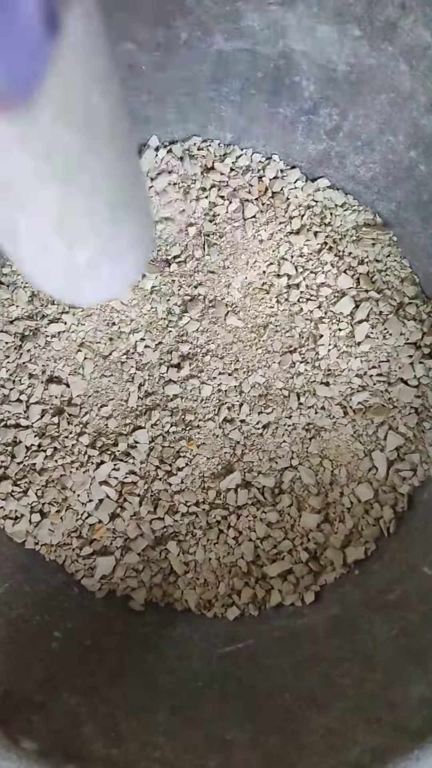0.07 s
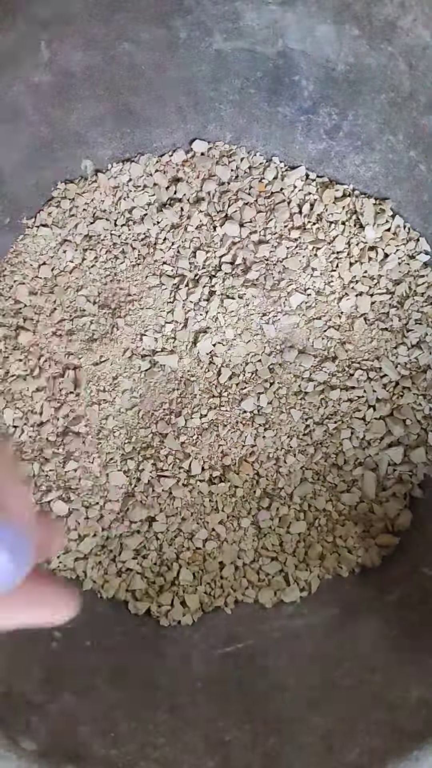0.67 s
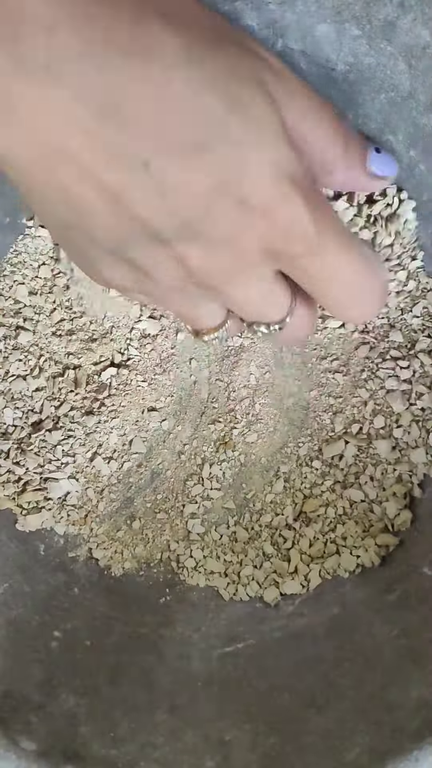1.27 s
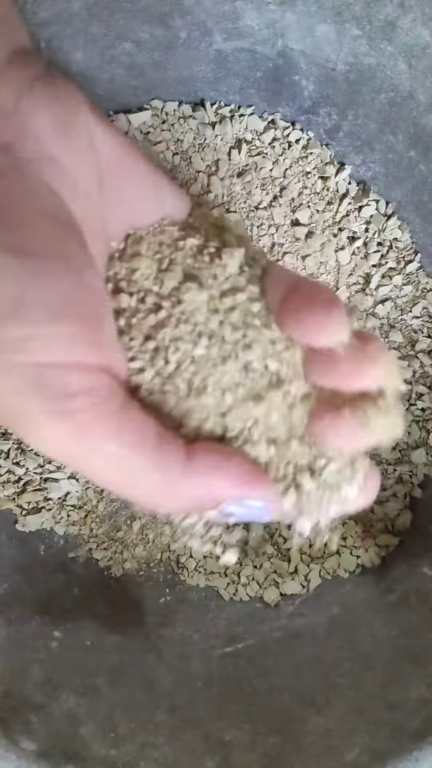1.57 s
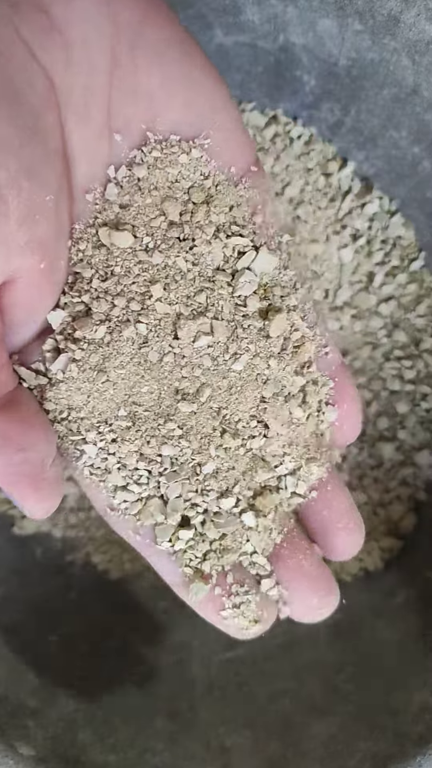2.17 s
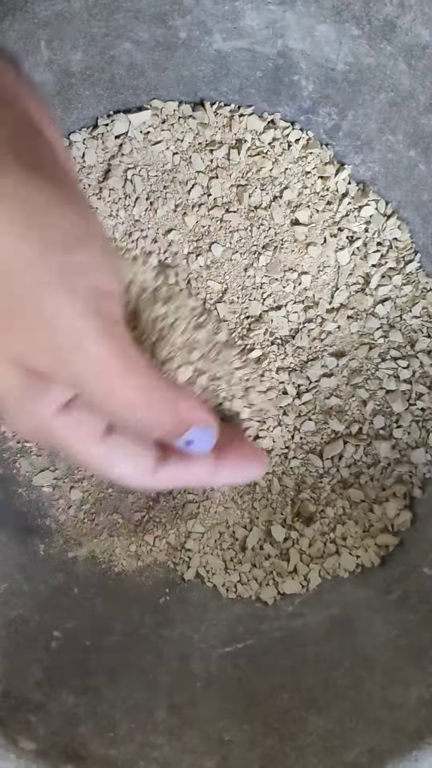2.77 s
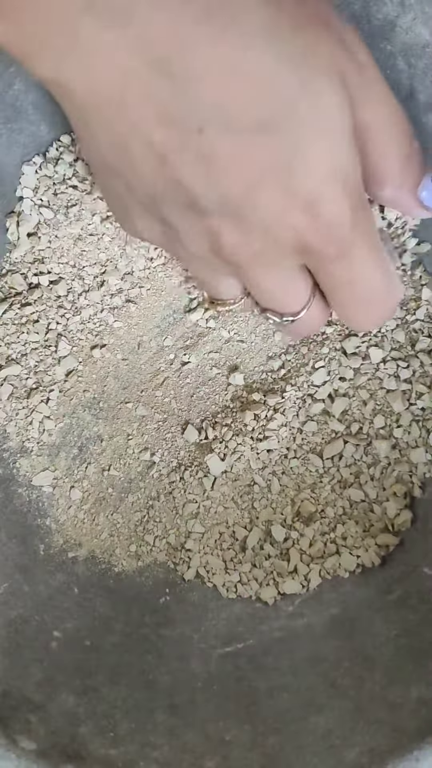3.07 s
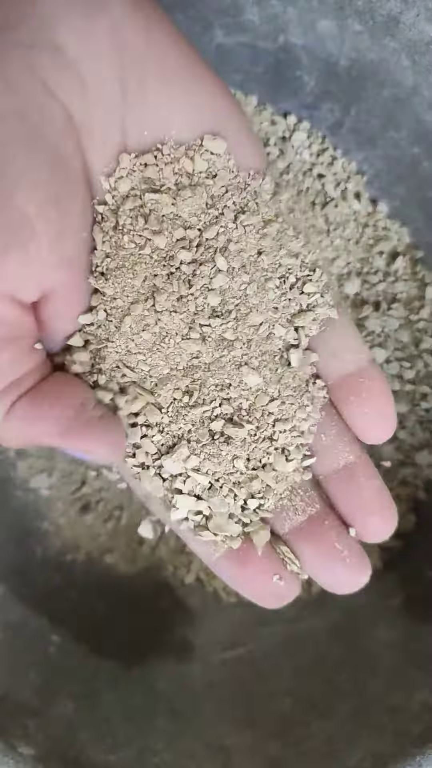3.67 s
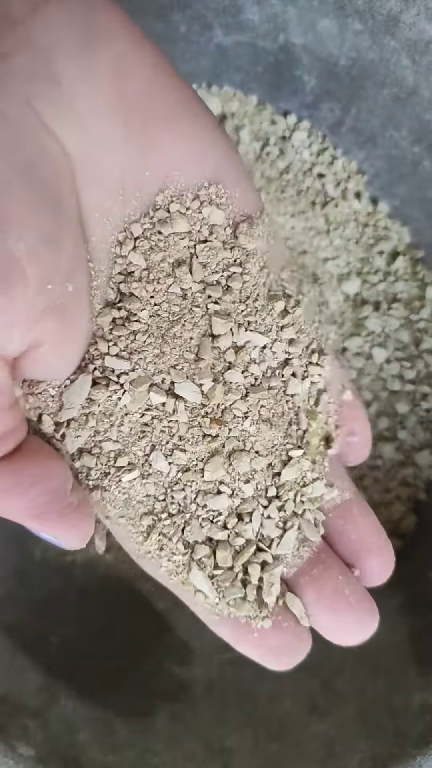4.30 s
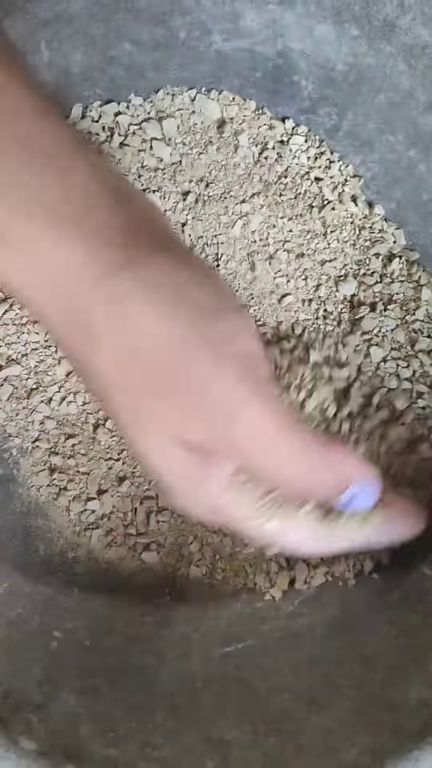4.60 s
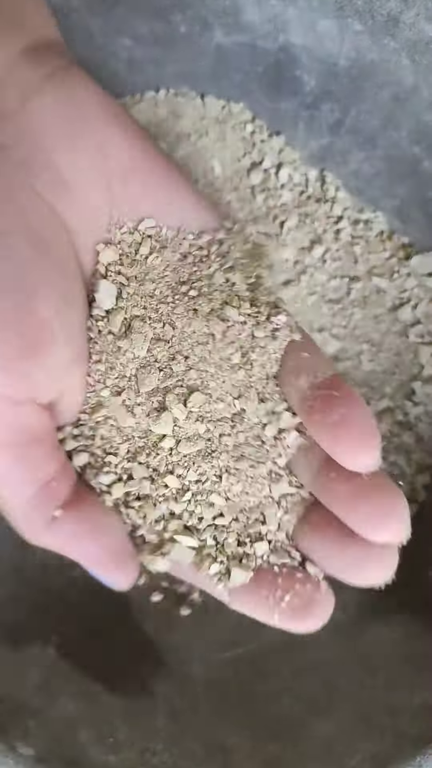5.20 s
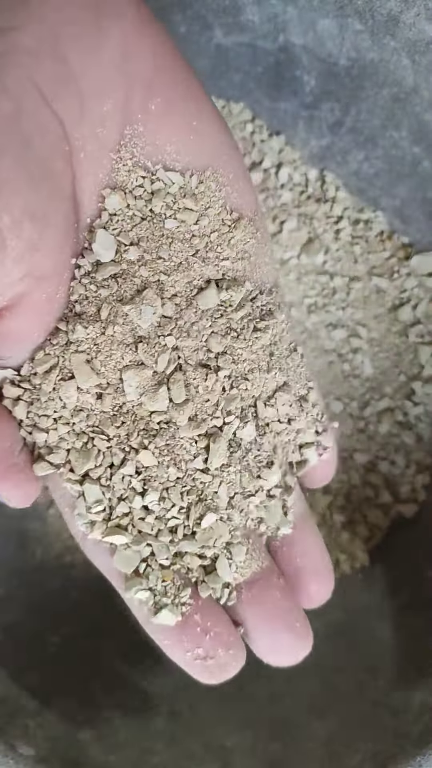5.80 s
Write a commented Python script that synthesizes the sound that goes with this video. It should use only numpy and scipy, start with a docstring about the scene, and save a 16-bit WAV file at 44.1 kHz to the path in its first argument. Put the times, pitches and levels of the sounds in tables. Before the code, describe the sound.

A stone pestle rapidly pounds dry clay in a metal bowl, then a hand quietly scoops and trickles the gritty crumbs.

```python
"""Seven quick, crunchy thuds of a stone pestle pounding dry clay in a metal bowl; then the sound of the
pounding cuts off abruptly, echo and all. Then a hand scoops the crumbs, lets them trickle back and scoops
again, a rustle of tiny collisions. A finger ring clinks on the metal, and the bowl rocks once against the floor
with a hollow bump. Behind it all sits a small room with a low rumble, a few faint thin tones and soft handling
noise."""
import sys
import numpy as np
from scipy import signal
from scipy.fft import rfft, irfft, next_fast_len
from scipy.io import wavfile
from scipy.ndimage import uniform_filter1d

SR = 44100
rng = np.random.default_rng(int(sys.argv[2]) if len(sys.argv) > 2 else 0)


def master_out(mix):
    """Clip the mix to full scale and print it as 16-bit PCM to the path in sys.argv[1]."""
    frames = np.transpose(np.atleast_2d(mix))
    ceiling = np.clip(frames, -1, 1)
    pcm = np.round(ceiling * 32767).astype(np.int16)
    wavfile.write(sys.argv[1], SR, pcm)


N = 257984
STOP_S = 0.439  # the pounding cuts off here

# bright colour of fine falling crumbs: f/Hz, level/dB
FINE_COLOUR = [(2000, -4), (4500, -2.5), (7500, 1.5), (9700, -6), (12500, 0.5), (15500, -1.5)]
# stereo image of the rumbles, narrow in the bass: f/Hz, left-right likeness
RUMBLE_IMAGE = [(60, 0.64), (150, 1), (380, 0.51), (700, 0.49), (1300, 0), (15000, 0.034)]


def pestle():
    """Each blow crushes crumbs under a growing push, then bottoms out and thuds the bowl."""
    # blows: t/s, thud level/dB, push level/dB, crushing time/s, ping level/dB, ping centre f/Hz
    blows = [(0.0, -24, -18, 0.00047, -46, 5000), (0.0717, -10, -16.5, .0006, -26.5, 6040),
             (0.1421, -28.5, -23, .0012, -31, 6200), (0.2145, -18, -22.5, .00043, -42, 3500),
             (0.2869, -7.5, -19, .00057, -35, 2180), (0.3589, -11, -14.5, .0011, -32.5, 3970),
             (0.4318, -12.5, -19.5, .0015, -34, 7950)]
    # modes of the stone pestle, damped by the hand: f/Hz, level/dB, t60/s
    stone_modes = [(2690, -2.5, 0.011), (4940, -4, 0.0097), (7600, -2, 0.0074), (8700, -17, 0.028)]
    # colour of cracking clay: f/Hz, level/dB
    crunch_colour = [(800, 1), (1800, 10), (3500, 0.5), (7500, 4), (9500, -7), (13000, -3), (15500, -5.5)]
    crunch_db = -36  # crumbs give way at the same force in every blow
    dull, crisp, t = np.zeros((2, N)), np.zeros((2, N)), np.arange(SR // 3) / SR
    for s, thud_db, push_db, crush_s, ping_db, centre_hz in blows:
        # the force builds while crumbs give way, and lets go as the bowl starts to swing
        push = np.interp(t, [0, crush_s + 0.00042, crush_s + 0.0011], [0, 1, 0])
        add(dull, s - crush_s, -amp(push_db) * push * lean(-0.7))
        body = amp(thud_db) * thud(t, pitch_hz=706 + 4 * thud_db)  # softer blows sound lower
        rebound = amp(push_db - 16.5) * swell(t, 0.0097) * np.sin(2 * np.pi * 152 * t)
        add(dull, s, body + rebound)
        # tiny cracks of uneven size follow the force and set the stone ringing
        cracks = unit(rng.standard_normal((2, len(t))) * amp(3.1 * rng.standard_normal(len(t))))
        crunch_gain = push + amp(-22 - 60 * t / 0.018) + amp(-18.5 - 60 * t / 0.1)
        add(crisp, s - crush_s, amp(crunch_db) * coloured(cracks, crunch_colour) * crunch_gain)
        ping = sum(around(hz, centre_hz, fall_db=11) * amp(db - 60 * t / t60)
                   * np.sin(2 * np.pi * hz * t) for hz, db, t60 in stone_modes)
        add(crisp, s - crush_s / 2, amp(ping_db) * ping * lean(-1.5))
        echo = room_echo(t, early_t60=0.081, late_t60=0.21, late_db=-7.5)
        add(crisp, s, amp(-21 + 0.48 * thud_db) * echo)
    # the bed of clay cushions the contact, so the thud has no treble
    cushioned = filtered(dull, lambda hz: 1 / np.sqrt(1 + (hz / 1500) ** 16))
    gate = np.clip((STOP_S - np.arange(N) / SR) * SR / 64, 0, 1)
    return (crisp + cushioned) * gate


def thud(t, pitch_hz):
    """The loaded bowl swings for only a few cycles; each mode leans to its own side."""
    # bowl modes, damped by the clay: multiple of the pitch, level/dB, time to peak/s, left lean/dB
    bowl_modes = [(1, 3, 0.00091, 3), (1.64, -14.5, 0.0015, -1.5), (2.2, -31.5, .0012, 9)]
    return -sum(amp(db) * lean(left_db) * swell(t, peak_s) * np.sin(2 * np.pi * pitch_hz * ratio * t)
                for ratio, db, peak_s, left_db in bowl_modes)


def bowl_bump():
    """The tipped bowl drops back on the floor with a dull, hollow bump."""
    # modes of the whole bowl: f/Hz, knock level/dB, time to peak/s, ring level/dB, t60/s
    bump_modes = [(167, -32.5, 0.0055, -37, 0.14), (273, -17, 0.0025, -33.5, 0.32),
                  (636, -18.5, 0.0028, -37, 0.1), (1066, -41, 0.0043, -43, 0.088),
                  (1570, -43, 0.0024, -57, 0.043)]
    land_s = 1.3418
    out, t = np.zeros((2, N)), np.arange(SR // 2) / SR
    add(out, land_s, amp(-26) * thud(t, pitch_hz=650))
    for hz, knock_db, peak_s, ring_db, t60 in bump_modes:
        knock = amp(knock_db) * swell(t, peak_s)
        ring = amp(ring_db - 60 * t / t60) * np.clip(t / peak_s, 0, 1)
        add(out, land_s, -(knock + ring) * np.sin(2 * np.pi * hz * t) * lean(1.5))
    add(out, land_s + 0.00291, amp(-29.5) * room_echo(t, early_t60=0.28, late_t60=0.44, late_db=-5))
    # the wide, soft contact gives neither treble nor deep bass
    return filtered(out, lambda hz: 1 / np.sqrt((1 + (hz / 2200) ** 4) * (1 + (165 / (hz + 1)) ** 8)))


def ring_clinks():
    """A finger ring taps or drags on the bowl's wall, scratching it and feeding its modes."""
    # touches: t/s, ringing level/dB, most excited f/Hz, scratch level/dB, time to peak force/s
    touches = [(0.816, -51, 3380, -59, 0.0015), (0.829, -52, 1900, -52, 0.0013),
               (2.597, -51, 1660, -41, 0.0026), (2.604, -54.5, 1820, -50, 0.0032),
               (2.635, -52, 1600, -59.5, 0.021), (2.658, -45, 2030, -49.5, 0.013)]
    # modes of the bare metal wall: f/Hz, level/dB, t60/s
    wall_modes = [(1548, -1, 0.14), (1640, -11, 0.1), (1940, -11.5, .08), (2436, -15, 0.083),
                  (3440, -15, 0.052), (3600, 0, 0.077), (4900, -12, 0.065)]
    # colour of the ring scraping metal: f/Hz, level/dB
    scratch_colour = [(900, -1.5), (1600, -2), (2400, -0.5), (4300, 2), (5500, -12), (6400, -1.5),
                      (8000, -12.5), (15000, -16)]
    out, t = np.zeros((2, N)), np.arange(SR // 3) / SR
    for s, ring_db, centre_hz, scratch_db, peak_s in touches:
        force = swell(t, peak_s)
        for hz, db, t60 in wall_modes:
            # a mode gathers energy while the contact lasts, and the rubbing jostles its phase
            energy = np.abs(signal.fftconvolve(force ** 2, amp(-60 * t / t60) ** 2)[:len(t)])
            phase = rng.random() + 0.098 * rng.standard_normal((2, 1))
            jostle = np.cumsum(0.016 * force * rng.standard_normal(len(t)))
            tone = np.sin(2 * np.pi * (hz * t + phase + jostle))
            strength = amp(ring_db + db) * around(hz, centre_hz, fall_db=7.5)
            add(out, s, strength * np.sqrt(energy / energy.max()) * tone)
        scratch = coloured(rng.standard_normal((2, len(t))), scratch_colour)
        add(out, s, amp(scratch_db) * force * scratch)
    return out


def crumbs():
    """Fingers plough through coarse crumbs; fine ones trickle off the palm, and a few crack sharply."""
    # fingers push through the heap, a few strokes to a scoop: t/s, length/s, level/dB
    strokes = [(0.80, 0.22, -64), (0.96, 0.11, -59.5), (1.13, 0.052, -59.5), (1.24, 0.098, -61),
               (2.6, 0.18, -64.5), (2.715, 0.079, -57), (2.83, 0.056, -64), (2.95, .22, -66.5),
               (4.545, 0.25, -60.5), (4.81, .09, -66.5)]
    # crumbs slide off the hand into the bowl: t/s, length/s, level/dB
    spills = [(2.325, 0.076, -69), (2.405, 0.038, -66), (2.455, 0.091, -66.5), (2.72, 0.036, -69),
              (4.08, 0.044, -68.5), (4.275, .035, -75), (4.43, 0.053, -66.5), (4.69, 0.037, -68)]
    # the palm jiggles and crumbs sift between the fingers: middle t/s, half length/s, level/dB
    sifts = [(1.66, 0.14, -79), (2.25, 0.047, -82), (3.58, 0.24, -82.5), (4.14, 0.24, -79),
             (5.34, 0.23, -76.5)]
    # colour of coarse crumbs rubbing together: f/Hz, level/dB
    coarse_colour = [(400, -4.5), (1000, 5), (2000, 2.5), (3500, 0.5), (5000, -4.5), (7800, -4),
                     (9500, -14.5), (15000, -19.5)]
    dig = gestures(strokes, attack_s=0.034, release_s=0.053)
    spill = gestures(spills, attack_s=0.048, release_s=0.032)
    sift = arches(sifts, rest_db=-88.5)  # the loose heap never quite rests
    trickle = np.sqrt(spill ** 2 + sift ** 2 + (amp(-16) * dig) ** 2)  # digging stirs up dust too
    churn = np.hypot(dig, amp(-0.5) * spill)  # a spill dislodges coarse crumbs where it lands
    coarse = churn * grains(coarse_colour, per_second=1300, spread_db=7.5, wash=1.36)
    fine = amp(6.5) * trickle * grains(FINE_COLOUR, per_second=700, spread_db=8.5, wash=1.0)
    cracks = (rng.random(N) < 90 / SR) * rng.standard_normal((2, N))
    grit = amp(-7) * (trickle + 0.3 * dig) * coloured(cracks, FINE_COLOUR)
    return coarse + fine + grit


def grains(spectrum, per_second, spread_db, wash):
    """Countless tiny collisions of uneven size over a wash of finer dust."""
    hits = (rng.random(N) < per_second / SR) * amp(spread_db * np.minimum(rng.exponential(size=N), 4))
    decay = np.exp(-np.arange(SR // 100) / (SR * 0.0017))
    patter = unit(np.sqrt(np.abs(signal.fftconvolve(hits ** 2, decay)[:N])))
    return coloured(rng.standard_normal((2, N)) * np.hypot(patter, wash), spectrum)


def crumb_ticks():
    """Larger crumbs break or land one by one, each with a short echo from the bowl."""
    # single crumbs, the smaller the brighter: t/s, level/dB, centre f/Hz
    ticks = [(0.506, -55, 7050), (0.575, -50, 6460), (0.614, -56.5, 7500), (1.186, -51, 2780),
             (1.564, -57, 13000), (1.609, -55.5, 7500), (2.375, -50, 11000), (3.226, -60, 5970),
             (3.829, -59.5, 10000), (4.041, -55, 12900), (4.112, -52.5, 10000), (4.717, -47, 14000),
             (5.238, -56.5, 9000), (5.358, -54.5, 8000)]
    out, t = np.zeros((2, N)), np.arange(SR // 10) / SR
    snap = amp(-5.5) * swell(t, peak_s=0.0011)
    echo = amp(-17 - 60 * t / 0.12)
    for s, db, centre_hz in ticks:
        hiss = coloured(rng.standard_normal((2, len(t))), FINE_COLOUR)
        crack = filtered(hiss, lambda hz: around(hz, centre_hz, fall_db=6.5))
        add(out, s, amp(db) * (snap + echo) * unit(crack))
    return out


def room_echo(t, early_t60, late_t60, late_db):
    """Near walls answer at once; the rest of the room rings on, mostly in the bass."""
    # dark colour of the reflections: f/Hz, level/dB
    colour = [(40, 1), (100, -2.5), (160, 0), (250, -4.5), (400, -4), (650, -2), (1000, -12), (1500, -20),
              (2200, -29.5), (7500, -42), (10000, -42), (15000, -58)]
    # their stereo image: f/Hz, left-right likeness
    image = [(100, 0.65), (600, 0.71), (1500, 0), (4000, 0)]
    early = stereo_noise(colour, image, len(t)) * amp(-60 * t / early_t60)
    late = filtered(stereo_noise(colour, image, len(t)), lambda hz: 0.39 + 0.73 / (1 + (hz / 380) ** 4))
    return (early + late * amp(late_db - 60 * t / late_t60)) * np.clip(t / 0.00092, 0, 1)


def whine():
    """Faint, thin, wavering tones of narrow-band noise come and go."""
    # tones: start t/s, end t/s, f/Hz, level/dB
    tones = [(2.21, 2.365, 715, -61.5), (2.75, 3.583, 869, -66.5), (2.854, 3.92, 3583, -76),
             (3.593, 3.952, 864, -64)]
    out, t = np.zeros((2, N)), np.arange(N) / SR
    for start, end, centre_hz, db in tones:
        noise = rng.standard_normal((2, N))
        tone = unit(filtered(noise, lambda hz: 1 / (1 + ((hz / centre_hz - 1) / 0.018) ** 2)))
        fade = np.clip(np.minimum(t - start, end - t) / 0.025, 0, 1)
        out += amp(db) * tone * fade
    return out


def handling():
    """Each reach of the arm shakes the hand-held microphone a little, over the hand's own tremor."""
    # the arm reaches in or lifts a handful: middle t/s, half length/s, level/dB
    reaches = [(0.9, 0.092, -58), (1.24, .06, -54), (3.13, 0.11, -57), (4.58, 0.11, -58),
               (5.2, 0.32, -55.5)]
    # deep colour of the arm's rumble: f/Hz, level/dB
    colour = [(20, -24), (50, 1.5), (85, 3.5), (150, -7), (300, -17.5), (800, -48), (3000, -90)]
    return arches(reaches, rest_db=-65.5) * stereo_noise(colour, RUMBLE_IMAGE, N)


def room_tone():
    """A steady low rumble, which dips briefly just after 0.44 s."""
    # colour of the room's rumble: f/Hz, level/dB
    colour = [(12, -55), (20, 3.5), (44, -1.5), (148, -7.5), (191, -11), (289, -7.5), (439, -12.5),
              (667, -13.5), (857, -16), (985, -16.5), (1670, -21.5), (2760, -31.5), (3540, -34),
              (4810, -41), (15500, -50.5)]
    t, resume_s = np.arange(N) / SR, 0.467
    dip = uniform_filter1d(1.0 * ((t > STOP_S) & (t < resume_s)), size=200)
    return amp(-54.5 - 11 * dip) * stereo_noise(colour, RUMBLE_IMAGE, N) * lean(0.3)


def stereo_noise(spectrum, image, size):
    """Noise of rms 1 whose two sides agree as far as the (Hz, likeness) image says."""
    def mid_side_gains(hz):
        angle = np.arccos(np.clip(along(image, hz), -1, 1)) / 2
        return np.array([np.cos(angle), np.sin(angle)])
    mid, side = filtered(rng.standard_normal((2, size)), mid_side_gains)
    return coloured(np.array([mid + side, mid - side]), spectrum)


def gestures(rows, attack_s, release_s):
    """Gain of (start, length, dB) movements: each builds up, holds and dies away."""
    t, power = np.arange(N) / SR, np.zeros(N)
    for s, length, db in rows:
        rise = np.clip((t - s) / attack_s, 0, 1)
        fall = np.exp(-np.maximum(t - s - length, 0) / release_s)
        power += (amp(db) * rise * fall) ** 2
    return np.sqrt(power)


def arches(rows, rest_db):
    """Gain of slow (middle, half length, dB) movements that swell and fade over a resting level."""
    t = np.arange(N) / SR
    power = sum(amp(db) ** 2 * np.exp(-((t - s) / half) ** 2) for s, half, db in rows)
    return np.sqrt(amp(rest_db) ** 2 + power)


def swell(t, peak_s):
    """Rises smoothly to 1 at the peak time, then dies."""
    u = np.maximum(t, 0) / peak_s
    return (u * np.exp(1 - u)) ** 2


def around(hz, centre_hz, fall_db):
    """Bell-shaped gain, fall_db down one octave either side of the centre."""
    return amp(-fall_db * np.log2((hz + 1) / centre_hz) ** 2)


def coloured(x, spectrum):
    """x shaped by a (Hz, dB) curve, at rms 1."""
    return unit(filtered(x, lambda hz: amp(along(spectrum, hz))))


def filtered(x, response):
    """x through a zero-phase filter whose gain is response(hz)."""
    n = x.shape[-1]
    padded = next_fast_len(n + 8192)
    return irfft(rfft(x, padded) * response(np.fft.rfftfreq(padded, 1 / SR)), padded)[..., :n]


def along(points, hz):
    """Interpolate (Hz, value) points on a log frequency axis."""
    freqs, values = np.transpose(points)
    return np.interp(np.log(hz + 1), np.log(freqs + 1), values)


def add(track, s, sound):
    """Mix a sound into the track from time s."""
    start = max(round(s * SR), 0)
    track[:, start:start + sound.shape[-1]] += sound[..., :N - start]


def lean(left_db):
    """Pan gains: left up and right down by left_db."""
    return amp([[left_db], [-left_db]])


def amp(db):
    return 10 ** (np.asarray(db) / 20)


def unit(x):
    return x / np.sqrt(np.mean(x ** 2) + 1e-20)


def scene():
    """The work in the bowl over the quiet background."""
    foreground = pestle() + bowl_bump() + ring_clinks() + crumbs() + crumb_ticks()
    return foreground + whine() + handling() + room_tone()


def record(dry):
    """A brick-wall low-pass takes off the very top."""
    return filtered(dry, lambda hz: hz < 15600)


dry = scene()
out = record(dry)
master_out(out)
```